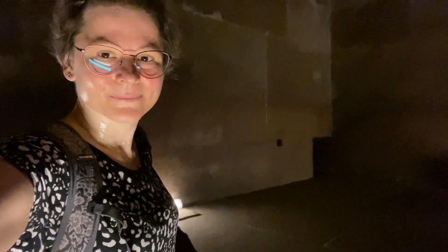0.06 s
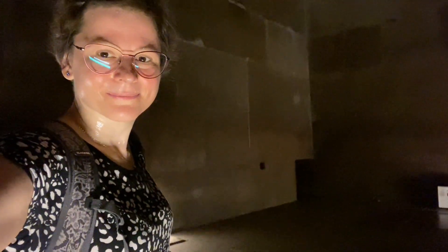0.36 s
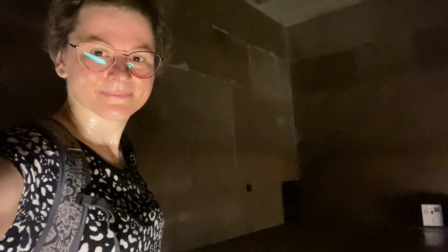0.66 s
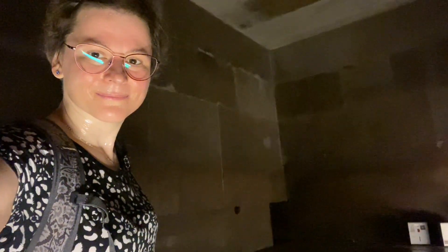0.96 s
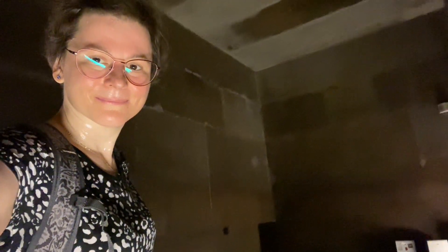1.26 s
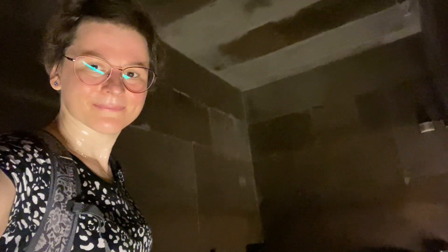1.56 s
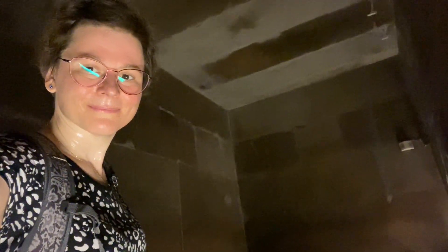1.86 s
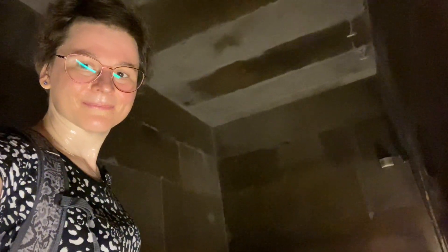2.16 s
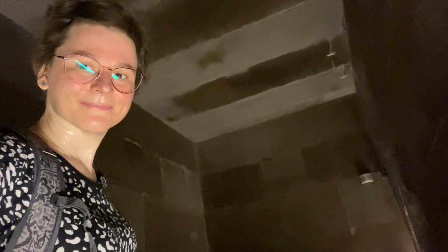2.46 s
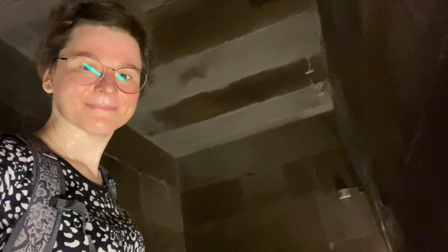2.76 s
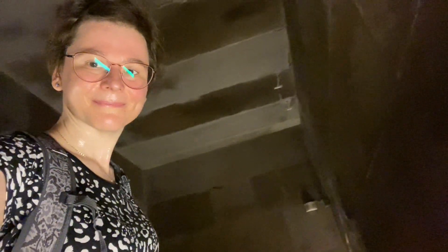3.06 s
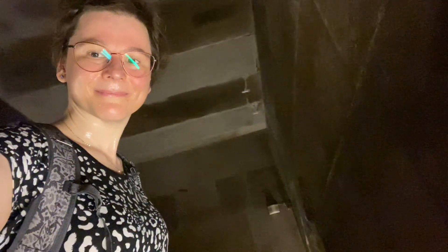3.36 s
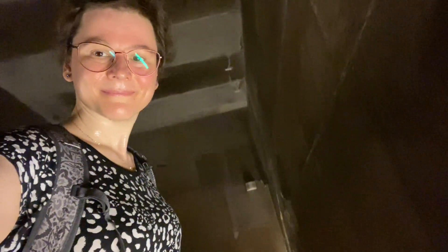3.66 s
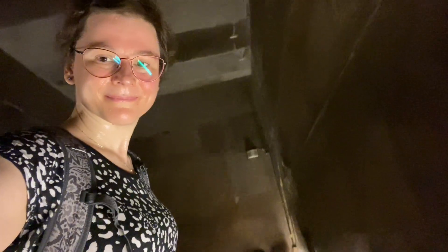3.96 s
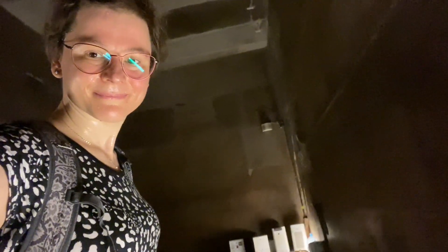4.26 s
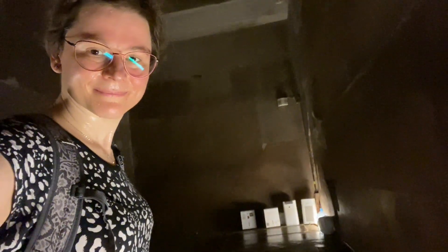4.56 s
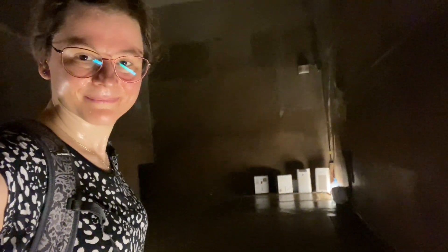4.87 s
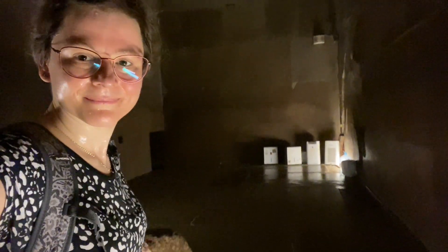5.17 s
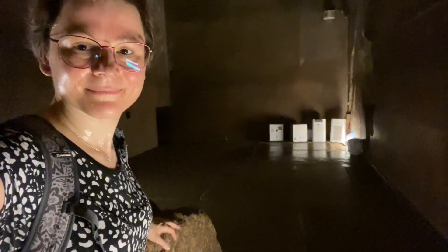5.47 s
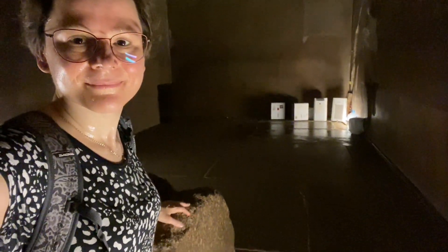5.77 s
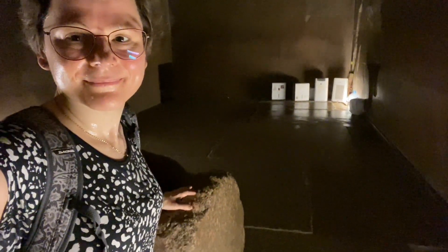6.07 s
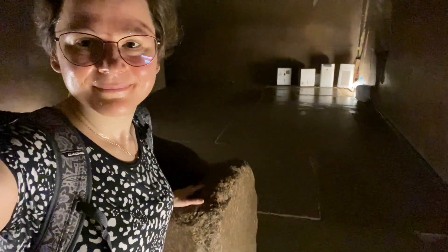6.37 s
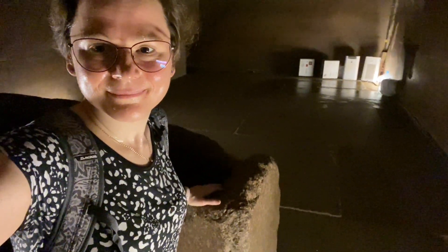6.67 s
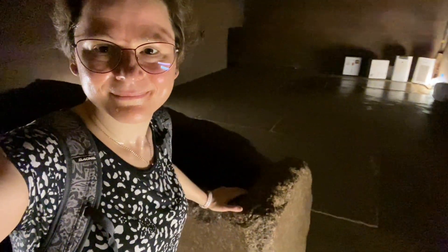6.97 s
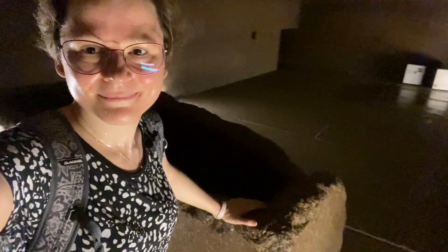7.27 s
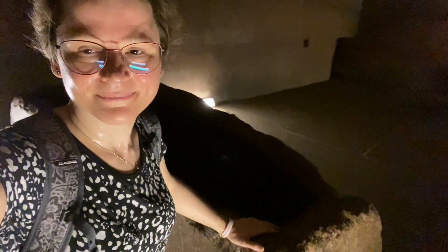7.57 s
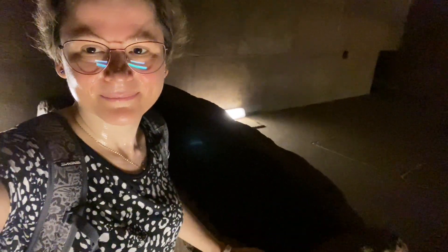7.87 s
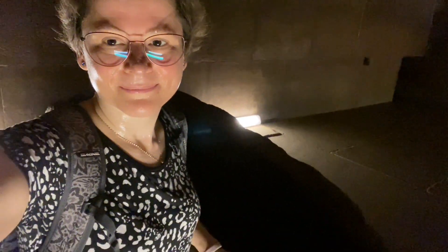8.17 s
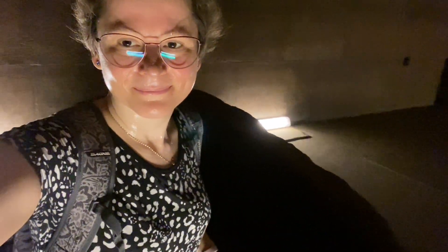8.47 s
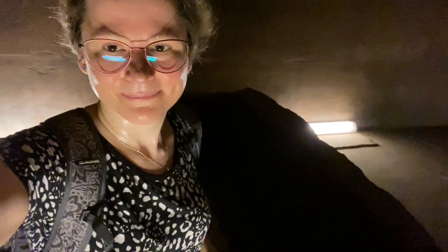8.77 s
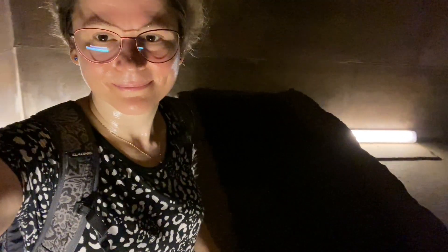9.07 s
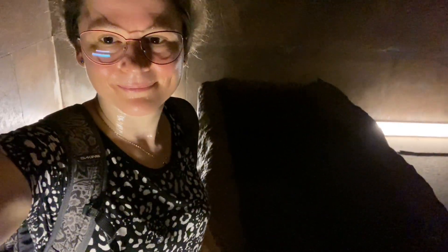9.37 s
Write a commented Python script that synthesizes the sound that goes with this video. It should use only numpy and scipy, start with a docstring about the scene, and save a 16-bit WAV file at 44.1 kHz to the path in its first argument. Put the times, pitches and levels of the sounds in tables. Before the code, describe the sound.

Ventilation fans run without a break in a bare stone chamber: a deep drone, a motor hum and rumbling, rushing air. Above them sits a much quieter thin, high whine that flares into tiny fluttering squeaks. The microphone is carried slowly through the room, so each low tone swells and fades separately. The deepest tone is strong at first, sinks after about 1.5 seconds and returns from about 5.5 to 8.5 seconds. The hum is fullest around 4 to 5 seconds, and a low room boom grows toward the end. Three small, dull ticks of grit under a shoe come between 3.3 and 4.1 seconds. Faint, hissy scuffs of soles and rustles of clothing come at about 3.4, 4.3 and 5.9 seconds and again from 8.6 to 9 seconds, dying away between the walls, well below the fans.

```python
"""A deep drone and hum of ventilation fans fill a bare stone chamber, with rushing air and a thin whine.
The turning shaft makes the drone and its overtones, motors hum and whine, and air swirls in a duct.
The microphone is carried slowly through the room's standing waves (fixed loud and quiet spots),
so each low tone swells and fades in its own way. Clothes rustle and soles scuff faintly on the floor."""
import sys
import numpy as np
from scipy import signal
from scipy.fft import rfft, irfft, next_fast_len
from scipy.io import wavfile
from scipy.ndimage import uniform_filter1d, map_coordinates

SR = 44100
rng = np.random.default_rng(int(sys.argv[2]) if len(sys.argv) > 2 else 0)


def generate_wav(sig):
    """Save sig (samples, or channels by samples) to the path in sys.argv[1] as 16-bit PCM at SR."""
    pcm = np.round(np.clip(np.atleast_2d(sig).T, -1, 1) * 32767).astype(np.int16)
    wavfile.write(sys.argv[1], SR, pcm)


N = 424667
SHAFT_HZ = 48.25  # turns a second; a tone of "order" 5 vibrates five times a turn


def drone(turns, hum_hz=200.0, ring_hz=147.7, rough_db=-18):
    """The shaft's low tones, a ringing room note and the motor hum each pass through loud and quiet spots."""
    # One loudness curve a tone. Each row: time in seconds, level in dB.
    shaft = [(0.0, -35), (1.25, -37), (1.6, -43.5), (2.15, -50), (2.7, -52), (3.2, -43.5), (3.55, -45),
             (3.9, -52), (4.15, -50), (4.45, -59), (4.75, -61), (5.0, -46), (5.4, -40.5), (6.4, -36.5),
             (7.6, -37), (8.4, -40.5), (8.85, -47), (9.6, -49.5)]
    octave = [(0.0, -43.5), (0.9, -44), (1.6, -54), (2.7, -57), (4.1, -43), (4.8, -44), (5.1, -50),
              (5.5, -42), (5.9, -41.5), (6.35, -35.5), (6.85, -44), (7.3, -35), (7.8, -36.5), (8.1, -41),
              (8.4, -50), (9.0, -41), (9.6, -39)]
    fifth = [(0, -42), (.45, -46), (1.1, -43.5), (1.5, -53), (2.05, -46), (2.4, -57), (3.15, -48),
             (5.35, -62), (5.55, -41.5), (5.95, -39), (6.35, -45.5), (6.75, -44), (7.15, -54), (7.45, -40),
             (7.8, -41), (8.2, -55), (9.63, -51)]
    seventh = [(0, -58), (.4, -48), (.95, -60), (1.2, -47), (1.8, -62), (2.3, -46), (2.75, -48), (3, -58),
               (3.38, -45), (3.65, -59), (3.88, -44.5), (4.3, -54), (4.6, -50), (5, -64), (5.25, -50),
               (5.7, -50), (6.35, -60), (6.7, -50), (7.4, -48.5), (8.05, -44.5), (8.65, -58), (8.95, -47),
               (9.63, -54)]
    eighth = [(0, -54), (1.3, -58), (1.68, -48.5), (1.92, -60), (2.17, -50), (2.42, -56), (2.65, -47),
              (2.95, -61), (3.75, -50), (3.95, -60), (4.2, -49), (4.6, -65), (4.95, -49), (5.35, -48),
              (5.7, -55), (6.2, -51), (6.45, -56), (7.6, -51), (8.18, -45.5), (8.4, -57), (8.68, -45),
              (9.1, -55), (9.63, -62)]
    room_ring = [(0, -53), (1.7, -48), (3.2, -53), (4.1, -66), (5.7, -47), (6.05, -39.5), (6.6, -43),
                 (7.55, -60), (8.2, -47), (8.6, -52), (9.2, -44), (9.63, -45)]
    motor_hum = [(0, -54), (0.8, -48), (1.25, -39), (2, -42), (3.2, -38.5), (3.8, -35.5), (4.5, -33.5),
                 (5.15, -36.5), (5.8, -44), (6.4, -48), (7.4, -46), (8, -42), (9.63, -41.5)]
    pair = level(shaft) * rough_tone(turns, rough_db=-19)
    pair += level(octave) * rough_tone(turns, rough_db=-2, order=2)
    for order, rows in [(5, fifth), (7, seventh), (8, eighth)]:
        pair += level(rows) * rough_tone(turns, rough_db, order=order)
    pair += level(room_ring) * rough_tone(ring_hz * clock(), rough_db)
    return pair + level(motor_hum) * rough_tone(hum_hz * clock(), rough_db)


def air(rumble_db=-39, rush_db=-38.5, boom_hz=151, boom_width_hz=14):
    """Air swirling in the duct rumbles and rushes, and the room booms around one low pitch."""
    # The colour of each noise. Each row: frequency in Hz, relative level in dB.
    rumble_colour = [(20, -55), (28, -39), (36, -24), (54, -13), (68, -4.5), (82, -7.5), (90, -8.5),
                     (105, -1.5), (125, -1), (152, -5), (190, -3), (260, -9.5), (500, -65.5)]
    rush_colour = [(100, -8.5), (200, 3.5), (340, 0.5), (420, -4.5), (520, -11), (740, -10), (880, -8),
                   (1150, -13.5), (1700, -22), (2500, -24.5), (4400, -34.5), (6300, -37.5), (8500, -44.5),
                   (10500, -44.5), (13500, -72)]
    # The boom is strongest at the end of the walk. Each row: time in seconds, level in dB.
    booming = [(0.0, -47), (1.2, -42), (2.4, -48), (5.0, -45.5), (6.2, -44), (7.4, -45.5), (9.6, -37.5)]
    rumble = amp(rumble_db - 0.57 * wobble(3.8)) * noise(lambda hz: amp(along(rumble_colour, hz)))
    boom = level(booming) * noise(lambda hz: 1 / (1 + ((hz - boom_hz) / boom_width_hz) ** 2))
    rush = amp(rush_db + 0.58 * wobble(5)) * noise(lambda hz: amp(along(rush_colour, hz)))
    return rumble + boom + rush


def overtones(turns):
    """Blades pass 18 times a turn; their tone throbs against the next one up, among other shaft tones."""
    # One loudness curve a tone. Each row: time in seconds, level in dB.
    ninth = [(0, -56), (.5, -52), (.9, -59), (1.8, -55), (3.2, -56), (3.7, -63), (4.15, -49.5),
             (4.7, -50.5), (5.1, -62), (6.5, -59), (6.95, -52), (7.2, -66), (8.6, -55), (9.63, -58)]
    blades = [(0, -59), (.6, -52.5), (.8, -60), (1.1, -51), (1.6, -59), (1.8, -50), (2.1, -63), (2.6, -66),
              (3, -53.5), (3.7, -50.5), (3.95, -62), (4.3, -50), (4.52, -57), (4.75, -50), (5, -65),
              (5.5, -54), (6.4, -53.5), (7.25, -60), (7.55, -50.5), (7.9, -51.5), (8.45, -62), (8.8, -54.5),
              (9.25, -53.5), (9.63, -66)]
    above_blades = [(0, -61), (.45, -53.5), (.7, -65), (.92, -53), (1.25, -63), (2.35, -56), (2.6, -62),
                    (3.4, -54), (4.2, -56), (4.45, -62), (4.65, -53), (5.1, -70), (5.35, -57), (6.8, -63),
                    (7.55, -55), (8.1, -54), (8.6, -70), (9.2, -58), (9.63, -66)]
    # Weaker shaft tones. Each row: vibrations per turn, level in dB.
    weak_tones = [(6, -53.5), (10, -65.5), (20, -85), (23, -75), (24, -71.5), (25, -67.5), (26, -72.5),
                  (29, -77), (32, -72)]
    pair = np.zeros((2, N))
    for order, rows in [(9, ninth), (18, blades), (19, above_blades)]:
        pair += along_path(reflected(order * turns, steady=3), rows)
    for order, db in weak_tones:
        pair += amp(db) * reflected(round(order) * turns, steady=1.6)
    return pair


def whines(turns, low_hz=2663, high_hz=2890, whistle_hz=2849.5, slow_rotor_hz=46.5):
    """Two motors whine, one just below and one just above a purer whistle, in a thin haze of noise."""
    # The tones in each whine, lowest first. Each entry: relative level in dB.
    low_tones = [-15, -5, -1, -1]
    high_tones = [0, 2, -2.5, -7, -9.5, -12]
    # Loudness along the walk. Each row: time in seconds, level in dB before the trims below.
    low_levels = [(0, -63), (1.2, -61), (1.7, -63), (2.4, -62), (3.1, -65), (3.5, -63), (3.85, -64),
                  (4.4, -62), (5.2, -61), (6.4, -65), (7, -63), (8.1, -64), (8.9, -63), (9.35, -66),
                  (9.63, -62)]
    high_levels = [(0, -61), (.4, -67), (1.2, -62), (1.6, -66), (2.4, -60), (2.85, -60), (3.5, -61),
                   (3.85, -66), (4.1, -61), (5.4, -63), (6.2, -61.5), (7.3, -64), (8.8, -63), (9.15, -62),
                   (9.45, -66), (9.63, -63)]
    whistle_levels = [(0, -65), (.3, -70), (.7, -62), (1.25, -61), (1.6, -70), (2.0, -60.5), (2.35, -55),
                      (2.85, -56.5), (3.1, -66), (3.5, -64), (3.85, -67), (4.1, -61.5), (5.2, -59.5),
                      (6.2, -67), (6.7, -66), (7.3, -66), (7.8, -62), (8.3, -64), (8.9, -63), (9.35, -70),
                      (9.63, -63)]
    low = motor_whine(turns, low_hz, slow_rotor_hz, low_tones, steady=0.9)
    high = motor_whine(turns, high_hz, SHAFT_HZ, high_tones, steady=1.4)
    whistle = reflected(whistle_hz * turns / SHAFT_HZ, steady=4.5)
    haze = amp(-68) * noise(lambda hz: bell(hz - 2850, width=120))
    pair = amp(-0.1) * along_path(low, low_levels)
    pair += amp(-2.5) * along_path(high, high_levels)
    pair += amp(-2.0) * along_path(whistle, whistle_levels)
    return pair + haze


def motor_whine(turns, lowest_hz, rotor_hz, tones_db, steady):
    """The turning rotor splits a motor's high tone into a row of evenly spaced tones."""
    seconds = turns / SHAFT_HZ  # time that drifts with the shaft's speed
    tones = (amp(db) * reflected((lowest_hz + k * rotor_hz) * seconds, steady)
             for k, db in enumerate(tones_db))
    return unit(sum(tones))


def squeaks(turns, flutter=0.48, side_db=-3):
    """One pitch in the whine flares up briefly, fluttering once per shaft turn."""
    # Each row: time of the peak in seconds, level in dB, half the length in seconds, pitch in Hz.
    flares = [(.05, -62, .1, 2889), (.41, -61, .08, 2757), (.76, -59.5, .1, 2889), (.89, -60, .08, 2849),
              (1.06, -57, .08, 2757), (1.21, -54.5, .08, 2757), (1.42, -59, .07, 2802),
              (1.57, -59, .08, 2802), (2.85, -59, .08, 2939), (3.2, -62, .07, 2889),
              (3.48, -56.5, .09, 2849), (4.04, -59.5, .12, 2889), (4.32, -57, .11, 2849),
              (4.51, -58.5, .08, 2802), (4.69, -59, .08, 2802), (4.86, -57.5, .1, 2757),
              (5.05, -59, .07, 2849), (5.17, -57, .08, 2802), (5.43, -60, .08, 2802),
              (5.57, -60, .08, 2849), (5.83, -59, .1, 2849), (6.32, -62.5, .09, 2889),
              (6.58, -60, .07, 2849), (6.74, -55.5, .08, 2849), (7.01, -55.5, .08, 2802),
              (7.38, -60.5, .07, 2802), (7.65, -60, .08, 2849), (7.87, -59.5, .09, 2802),
              (8.75, -62, .08, 2849), (9.14, -57, .25, 2939), (9.55, -56.5, .1, 2849)]
    pair = np.zeros((2, N))
    for peak_s, db, half_s, hz in flares:
        t = clock() - peak_s
        near = np.abs(t) < half_s
        swell = amp(db) * np.cos(np.pi / 2 * t[near] / half_s) ** 2
        throb = 1 + flutter * np.cos(2 * np.pi * (turns[near] + rng.random()))
        tone = np.sin(2 * np.pi * (hz * t[near] + rng.random((2, 1))))
        pair[:, near] += swell * unit(throb * tone)
    return pair * amp([[0], [side_db]])


def scuffs(grain_db=4.0):
    """Rubbing soles and cloth make a grainy hiss that swells and dies away between the walls."""
    # Each row: time of the peak in seconds, level in dB, rise in seconds, seconds to fade by 60 dB,
    # centre frequency in Hz, width in octaves.
    strokes = [(3.348, -57, 0.013, 0.3, 4000, 1), (3.46, -62.5, 0.067, 2.1, 4400, 0.74),
               (3.7, -79, 0.45, 5.5, 11000, .35), (4.245, -58.5, 0.022, 0.4, 7000, 0.6),
               (4.29, -65.5, .11, .9, 6200, .65), (5.2, -75, 0.62, 7.6, 8400, 0.45),
               (5.85, -62, .025, 0.4, 5200, 0.71), (8.61, -68, .09, 0.8, 7500, .7),
               (8.9, -67, 0.13, 0.8, 6200, .85)]
    pair = np.zeros((2, N))
    for peak_s, db, rise_s, fade_s, centre_hz, octaves in strokes:
        t = clock() - peak_s
        swell = np.exp(-(np.minimum(t, 0) / rise_s) ** 2)
        fade = amp(-60 * np.maximum(t, 0) / fade_s)
        hiss = noise_band(centre_hz, octaves)
        pair += amp(db + grain_db * wobble(200)) * swell * fade * hiss
    return pair


def ticks(rise_s=0.0012, fade_s=0.076):
    """A grain of grit gives way under a sole with a short, dull tick."""
    # Each row: time in seconds, peak level in dB, centre frequency in Hz.
    grit = [(3.348, -47, 2670), (3.843, -53, 1700), (4.066, -46, 1850)]
    pair = np.zeros((2, N))
    for peak_s, db, ring_hz in grit:
        t = clock() - peak_s
        onset = np.clip(1 + t / rise_s, 0, 1)
        pair += onset * amp(db - 60 * np.abs(t) / fade_s) * noise_band(ring_hz, octaves=0.25)
    return pair


def sizzle():
    """The bearings hiss faintly in narrow bands, with ripples spaced by the shaft's turning rate."""
    # Each row: centre frequency in Hz, level in dB, width in Hz.
    bands = [(5130, -76.5, 240), (5410, -75, 130), (5660, -81.5, 100), (6170, -78.5, 67), (6510, -77.5, 90),
             (8040, -87, 110), (9860, -85.5, 220)]

    def colour(hz):
        power = 0
        for centre, db, width in bands:
            ripple = np.exp(np.cos(2 * np.pi * (hz - centre) / SHAFT_HZ))
            power += amp(db) ** 2 / width * bell(hz - centre, width / 2) * ripple
        return np.sqrt(power)

    total_gain = np.sqrt(sum(amp(db) ** 2 for _, db, _ in bands))
    return total_gain * noise(colour)


def rough_tone(cycles, rough_db, order=1, width_hz=9):
    """A tone in a standing wave, roughened by air noise of nearly the same pitch."""
    pitch_hz = order * cycles[-1] / clock()[-1]
    tone = np.sqrt(2) * np.sin(2 * np.pi * (order * cycles + rng.random()))
    roughness = amp(rough_db) * noise(lambda hz: bell(hz - pitch_hz, width_hz))
    return (np.outer([1, 0], tone) + roughness) / np.hypot(1, amp(rough_db))


def reflected(cycles, steady, mic_m_per_s=1.2, sound_m_per_s=343):
    """A tone's many echoes add up differently every half wavelength walked; more steady, less fading."""
    wavelength_m = sound_m_per_s * clock()[-1] / cycles[-1]
    fade_rate = 2 * mic_m_per_s / wavelength_m
    angles = 2 * np.pi * (cycles + rng.random((2, 1)))
    return np.array([unit((steady + wobble(fade_rate)) * np.cos(angle) + wobble(fade_rate) * np.sin(angle))
                     for angle in angles])


def along_path(pair, rows, smooth_s=0.46):
    """The first signal swells along the walk and keeps its quick flicker; the second gets the average level."""
    gain = level(rows)
    slow_power = uniform_filter1d(pair[0] ** 2, int(smooth_s * SR))
    slow_level = np.sqrt(np.abs(slow_power) + 1e-9)
    average_gain = np.sqrt(np.mean(gain ** 2))
    return np.array([gain * pair[0] / slow_level, average_gain * unit(pair[1])])


def chamber(pair):
    """Echoes from all round: a pair's first signal reaches both ears, its second makes them differ."""
    # Sound that reaches the left first. Each row: frequency in Hz, share from 0 to 1.
    left_first = [(420, 0.07), (600, 0.73), (900, 0.44), (1600, 0.25), (2600, 0)]
    # Stereo width, narrow in the bass. Each row: frequency in Hz, side against mid in dB.
    width = [(60, -6.5), (91, -14), (140, -25.5), (210, -12), (320, -11.5), (480, 3.5), (730, 2.5),
             (1110, -1.5), (1690, 4), (2560, -1), (3880, -1), (5890, 1.5), (8940, -21), (13600, 12)]
    # Balance. Each row: frequency in Hz, left against right in dB.
    lean = [(60, -3), (98, -1), (160, -3), (260, 0), (430, -3), (710, -3.5), (1150, 2.5), (1890, 3.0),
            (3090, 5), (5060, 4.0), (8280, 0.5), (13600, -0.5)]
    lead = lambda hz: np.clip(along(left_first, hz), -1, 1)
    mid = pair[0]
    early = filtered(mid, lambda hz: 1j * lead(hz))  # 1j moves a wave a quarter cycle ahead
    scattered = filtered(pair[1], lambda hz: np.sqrt(1 - lead(hz) ** 2))
    side = filtered(early + scattered, lambda hz: amp(along(width, hz)))
    left_right = np.array([mid + side, mid - side])
    return filtered(left_right, lambda hz: amp(np.outer([.5, -.5], along(lean, hz))))


def amp(db):
    """Turn decibels into a gain to multiply by."""
    return 10 ** (np.asarray(db) / 20)


def unit(x):
    """Scale a signal to an average power of 1."""
    return x / np.sqrt(np.mean(np.abs(x) ** 2) + 1e-20)


def bell(offset, width):
    """A bell curve, 1 where the offset is zero."""
    return np.exp(-.5 * (offset / width) ** 2)


def along(points, hz):
    """Read between rows of frequency and value, on a scale of octaves."""
    frequencies, values = np.transpose(points)
    return np.interp(np.log(hz + 1), np.log(frequencies + 1), values)


def clock():
    """The time of every sample, in seconds."""
    return np.arange(N) / SR


def level(rows):
    """Turn rows of seconds and dB into a gain for every sample."""
    return amp(np.interp(clock(), *np.transpose(rows)))


def wobble(rate):
    """A smooth curve through `rate` random points a second."""
    coarse = clock()[::64]
    points = rng.standard_normal(1024)
    return np.interp(clock(), coarse, map_coordinates(points, [coarse * rate], mode="wrap"))


def filtered(x, response):
    """Multiply each frequency in x by response(hz)."""
    size = next_fast_len(N + 8192)
    return irfft(rfft(x, size) * response(np.fft.rfftfreq(size, 1 / SR)), size)[..., :N]


def noise(response):
    """Two unrelated noises of the same colour, with an average power of 1."""
    return unit(filtered(rng.standard_normal((2, N)), response))


def noise_band(centre_hz, octaves):
    """Two noises gathered around one frequency."""
    return noise(lambda hz: bell(np.log2((hz + 1) / centre_hz), octaves))


def scene(drift=0.000482):
    """Fans with a slightly unsteady shaft speed fill the chamber, along with faint scuffs and ticks."""
    turns = np.cumsum(SHAFT_HZ * (1 + drift * wobble(2.944))) / SR
    fans = drone(turns) + overtones(turns) + whines(turns) + squeaks(turns) + sizzle() + air()
    soft_ends = signal.windows.tukey(N, 0.001)
    return chamber(soft_ends * (fans + scuffs() + ticks()))


def record(dry, low_cut_hz=33, top_hz=13600):
    """The microphone sheds the deepest bass, and the highest treble is cut off."""
    return filtered(dry, lambda hz: (hz < top_hz) / np.sqrt(1 + (low_cut_hz / (hz + 1)) ** 12))


dry = scene()
out = record(dry)
generate_wav(out)
```